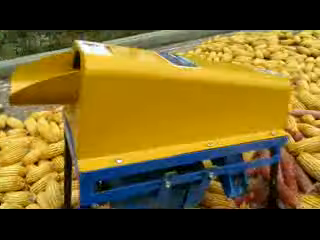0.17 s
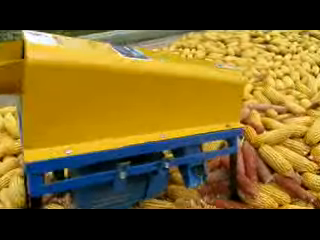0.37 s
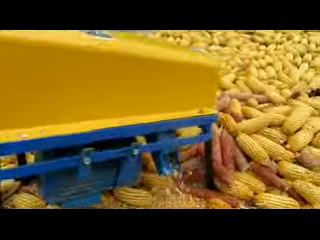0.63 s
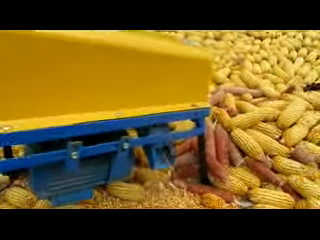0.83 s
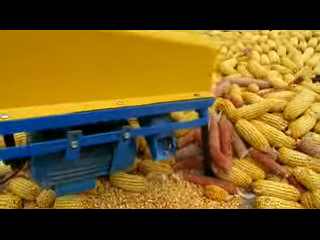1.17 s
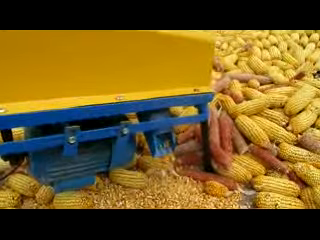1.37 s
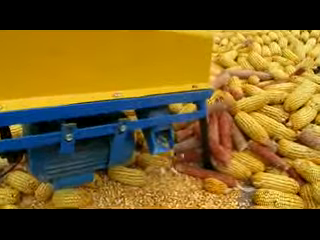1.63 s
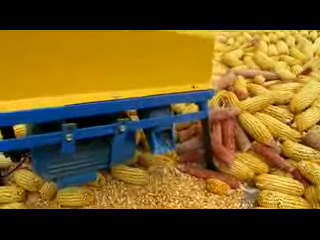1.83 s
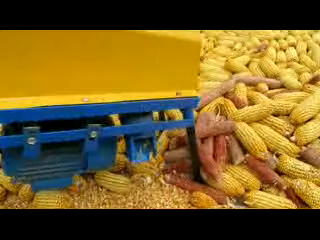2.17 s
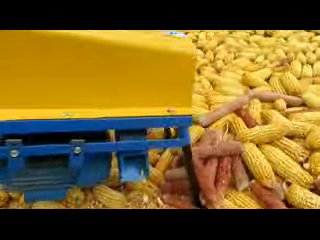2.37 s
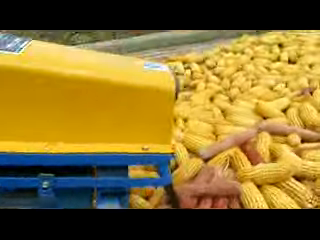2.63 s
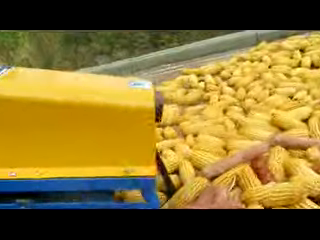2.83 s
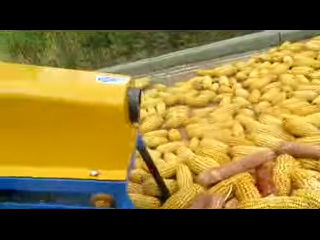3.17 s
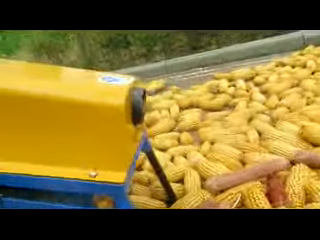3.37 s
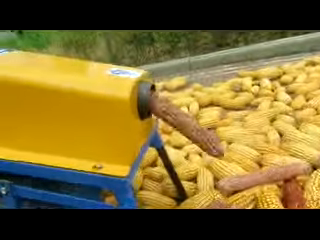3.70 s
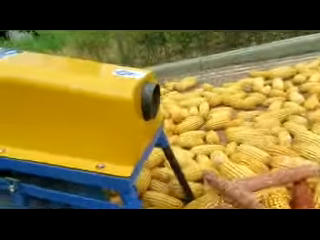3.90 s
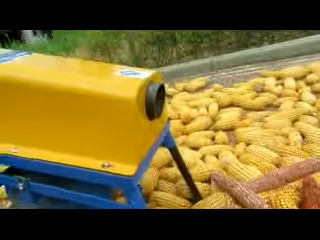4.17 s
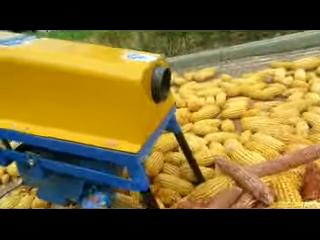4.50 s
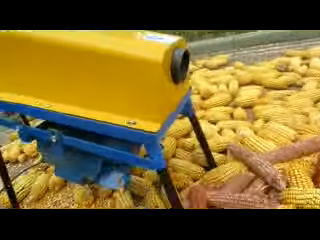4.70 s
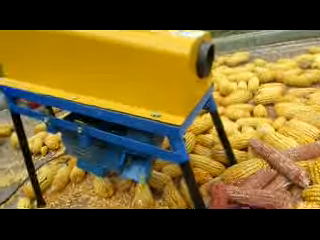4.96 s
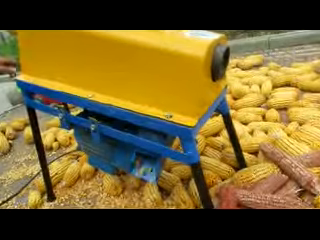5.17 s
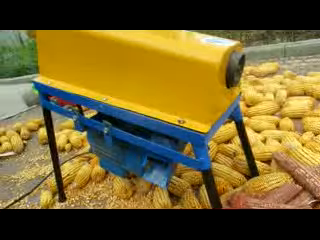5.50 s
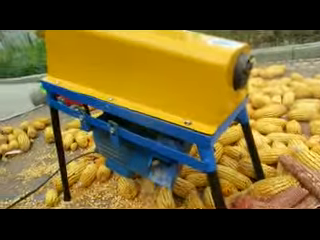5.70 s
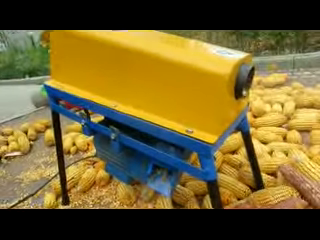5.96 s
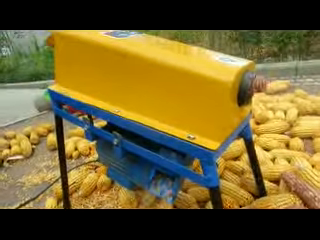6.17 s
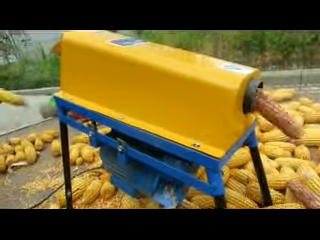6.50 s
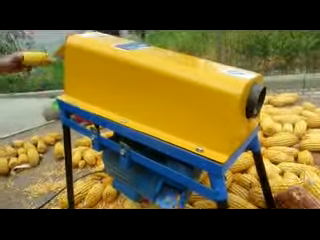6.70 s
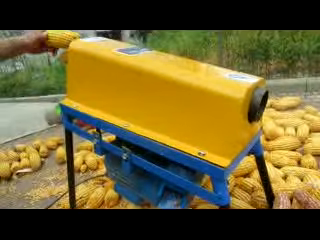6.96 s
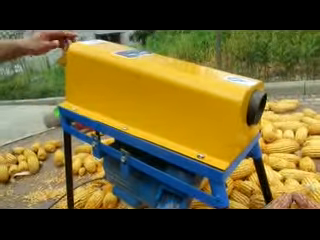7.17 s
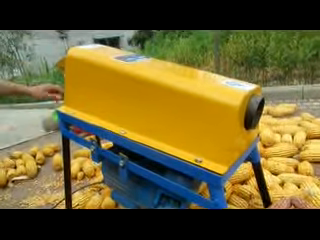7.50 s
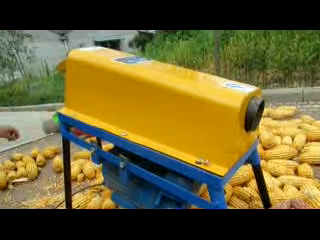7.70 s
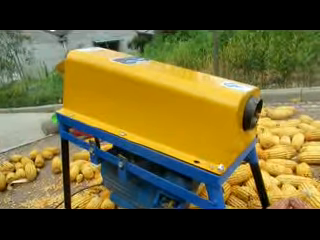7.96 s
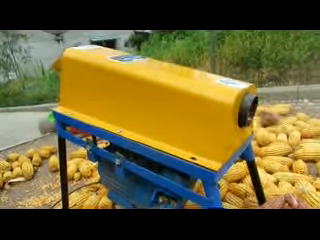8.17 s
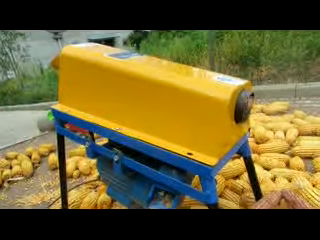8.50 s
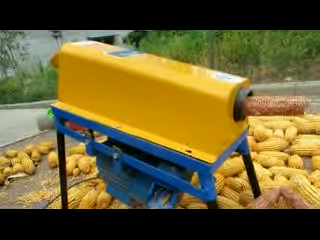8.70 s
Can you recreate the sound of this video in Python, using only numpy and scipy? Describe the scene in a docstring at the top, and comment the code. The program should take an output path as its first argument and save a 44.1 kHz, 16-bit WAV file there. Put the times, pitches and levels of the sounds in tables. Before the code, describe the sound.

A small electric corn sheller grinds ear after ear in harsh, raspy bursts that sag and stutter, with kernels pelting its sheet-metal housing.

```python
"""Outdoors, close by, a small electric corn sheller strips one ear after another.
The grinding is a frequency-modulated chatter that swerves wildly, slips and sags as each cob runs bare.
Loose kernels are random impulses that ring the modes of the sheet-metal housing throughout.
Between ears, cobs knock as noise bursts and bump as decaying tones, and a fresh ear tumbles as filtered impulses.
Under it all lies a faint motor: drifting hum lines and the rotor's coloured noise."""
import sys
import numpy as np
from scipy import signal
from scipy.fft import rfft, irfft
from scipy.io import wavfile
from scipy.ndimage import uniform_filter1d

SR = 44100
rng = np.random.default_rng(int(sys.argv[2]) if len(sys.argv) > 2 else 0)


def generate_wav(signal):
    """Clip the signal to [-1, 1] and save it as 16-bit WAV at the path in sys.argv[1]."""
    frames = np.transpose(np.atleast_2d(signal))
    scaled = np.clip(frames, -1, 1) * 32767
    pcm = np.round(scaled).astype(np.int16)
    wavfile.write(sys.argv[1], SR, pcm)


N = 389844

# Bouts of grinding, one for each ear or brief bite; levels and rates are relative, scaled again below:
# start t/s, end t/s, level/dB, full chatter f/Hz, end chatter f/Hz, sag time constant/s,
# kernel spray level/dB, level/dB of kernels left bouncing
GRINDING_BOUTS = [(0, .136, -9.5, 2550, 2499, .3, -26, -23.5),
                  (.174, 1.955, -9.5, 3330, 751, .29, -21, -27),
                  (2.908, 4.33, -9.5, 3699, 1951, .5, -20.5, -23),
                  (5.3, 6.975, -8, 3900, 249.9, .32, -18, -32),
                  (7.185, 7.218, -6.5, 1451, 1150, .3, -24, -43),
                  (7.741, 8.85, -6.5, 3647, 1847, .4, -16.6, -30)]
# The ear slips and the chatter runs down: start t/s, end t/s, share of the rate lost by the end (0-1)
EAR_SLIPS = [(.44, .48, .22), (.58, 0.649, .2), (1.4, 1.5, 0.17), (1.715, 1.812, 0.65),
             (1.858, 1.898, 0.27), (3.48, 3.57, .27), (3.905, 3.972, 0.31), (4.272, 4.329, .58),
             (5.29, 5.372, 0.47), (6.21, 6.27, .14), (6.36, 6.42, .33), (6.6, 6.626, .52),
             (6.706, 6.727, 0.61), (6.845, 6.885, .48), (7.185, 7.22, .5), (7.742, 7.79, 0.49)]
# Teeth snatch at a nearly bare cob and the chatter leaps: t/s, leap f/Hz (before speed scaling), t60/s
TOOTH_SNATCHES = [(1.815, 900.3, .05), (1.848, 1098, .05), (1.898, 1400, .06), (1.913, 2503, 0.23),
                  (6.693, 1400, .06), (6.882, 1106, .06), (6.913, 1000, 0.037), (6.933, 1200, .07),
                  (6.97, 1400, .025), (7.185, 2600, .035)]
# How well the machine radiates the chatter: f/Hz, level/dB
CHATTER_RADIATION = [(5, -50), (25, -30), (70, -25.5), (130, -16), (300, -7.5), (480, -5.5), (750, 0.5),
                     (1500, 0), (3000, -1), (6000, 0), (11000, -1.5)]
# Relative colour of the frame's shudder: f/Hz, level/dB (per Hz)
FRAME_COLOUR = [(10, -35), (40, -9), (100, -8), (200, 0.5), (350, 4.5), (650, -10), (1200, -27),
                (3000, -45)]
# Colour of the chatter's difference between the channels: f/Hz, level/dB
CHATTER_SIDE = [(10, -40), (100, -23.5), (350, -11.5), (1000, -14), (2000, -37), (3000, -43), (4000, -40),
                (10000, -18)]
# Relative colour of the kernel impacts: f/Hz, level/dB (per Hz)
IMPACT_COLOUR = [(40, -50), (100, -27), (200, -20), (350, -13.5), (520, -24), (620, -4), (1100, -4.5),
                 (2000, -0.5), (3200, 0), (4800, 1), (6200, 2), (8500, 2), (11000, -7.5)]
# Ringing modes of the sheet-metal housing, relative to each other: f/Hz, width/Hz, level/dB
HOUSING_MODES = [(253, 22, -8), (354, 100, -11), (635, 16, 0), (827, 12, -22), (993, 100, -4),
                 (1120, 37, -1), (1302, 16, 1), (1528, 35, -8), (1830, 33, -10), (2400, 15, -3),
                 (2710, 24, -10), (2860, 8.3, -26), (3110, 31, -12), (3530, 30, -10.5), (4520, 42, -11)]
# Cobs knock the housing and fling a burst of kernels: t/s, relative level/dB, t60/s
COB_KNOCKS = [(2.351, -22.5, 0.48), (2.42, -22.5, 0.37), (2.578, -17, 0.64), (2.679, -11, .45),
              (2.819, -13, 0.23), (4.415, -19, 0.31), (4.447, -19, 0.97), (4.55, -17, 0.91),
              (4.625, -14.5, 0.54), (4.72, -21, 0.6), (4.788, -14.5, 0.25), (4.883, -19, 0.16),
              (4.922, -19.5, 0.23), (4.96, -17, 0.31), (5.029, -18, 0.34), (5.104, -18.5, 0.19),
              (5.175, -13, 0.43), (5.255, -17, 0.22), (7.016, -19.5, 0.23), (7.078, -20.5, 0.41),
              (7.1, -20, 0.29), (7.32, -22.5, .16), (7.41, -24, 0.092), (7.478, -17, 0.14),
              (7.555, -22, 0.28), (7.599, -28, 0.15)]
# Side level relative to mid, for all noise but the chatter: f/Hz, level/dB
STEREO_WIDTH = [(100, -10), (800, -10.5), (1500, -32), (2300, -32), (2900, -35), (3700, -18.5), (6300, -17),
                (6900, -10.5), (7500, -13), (10500, -11)]
# Motor hum lines: nominal f/Hz, rms level/dB
HUM_LINES = [(101, -67), (161, -60.5), (248, -60), (743, -51), (1200, -46.5), (1335, -48)]
# Relative colour of the running rotor's rush: f/Hz, level/dB (per Hz)
ROTOR_COLOUR = [(30, -36), (70, -34), (110, -18), (250, -0.5), (520, -1), (750, 7), (1250, 5.5),
                (1420, -10), (3000, 5), (10000, -17)]
# A fresh ear tumbles ever harder until gripped: gripped at t/s, rumble level/dB, relative spray level/dB
EAR_FEEDS = [(.174, -31, -29), (2.908, -19, -17), (5.3, -38, -21.5), (7.741, -30, -17.5)]
# Relative colour of the tumbling rumble: f/Hz, level/dB (per Hz)
DRUM_COLOUR = [(40, -40), (100, -9.5), (200, -4.5), (310, 5.5), (450, -3.5), (800, 0.5), (1300, -10),
               (3000, -28)]
# Dull bumps of cobs against the machine and the heap: t/s, f/Hz, level/dB, t60/s
COB_BUMPS = [(1.955, 130, -18, 0.046), (2.682, 974, -17.5, .54), (2.765, 948, -30, .3),
             (2.825, 798, -17, 0.31), (2.878, 279.8, -18.5, .12), (4.33, 90.1, -30, 0.067),
             (4.505, 824, -17.5, 0.24), (4.66, 2380, -24, .3), (4.795, 2380, -20.5, 0.29),
             (4.825, 3300, -27, .25), (5.176, 994, -24.5, 0.35), (6.975, 120, -31, 0.047),
             (7.22, 90, -21, 0.092)]

TOP_HZ = 11100
TIME = np.arange(N) / SR
FREQ = np.maximum(np.arange(N // 2 + 1) * SR / N, 1e-3)


def undb(db):
    """Decibel law: level to amplitude gain."""
    return 10 ** (np.asarray(db) / 20)


def unit(x):
    """Normalisation: scale to rms 1."""
    return x / np.sqrt(np.mean(x ** 2))


def colour(table):
    """Spectral envelope: levels interpolated over log frequency, as gains."""
    hz, db = np.transpose(table)
    return undb(np.interp(np.log(FREQ), np.log(hz), db))


def shape(x, response):
    """Linear filtering: multiplication by a frequency response."""
    return irfft(rfft(x) * response, N)


def coloured_noise(table):
    """Noise synthesis: white noise filtered to a spectral envelope, rms 1."""
    return unit(shape(rng.standard_normal(N), colour(table)))


def wander(hz):
    """Low-pass noise: random motion of spread 1, mostly slower than hz."""
    return unit(shape(rng.standard_normal(N), 1 / (1 + (FREQ / hz) ** 2)))


def decay(start, t60):
    """Exponential damping: sudden rise, then a fall of 60 dB in t60 seconds."""
    age = TIME - start
    return (age >= 0) * np.exp(-np.log(1000) * np.clip(age / t60, 0, 10))


def during(start, end):
    """Gating: 1 between two times, 0 elsewhere."""
    return 1. * ((TIME >= start) & (TIME < end))


def stereo(mid, side):
    """Sum and difference: left and right from mid and side."""
    return mid + side * np.array([[1], [-1]])


def chatter_rate():
    """Varying load: the base rate in Hz sags as the cob runs bare, falls in slips and leaps in snatches."""
    rate = np.zeros(N)
    for start, end, _, full_hz, end_hz, sag_s, _, _ in GRINDING_BOUTS:
        bare = np.exp(np.minimum(TIME - end, 0) / sag_s)
        rate += during(start, end) * (full_hz + (end_hz - full_hz) * bare)
    for start, end, lost in EAR_SLIPS:
        progress = during(start, end) * (TIME - start) / (end - start)
        rate *= 1 - lost * np.sqrt(progress)  # falls fastest as the ear lets go
    return rate + sum(leap_hz * decay(s, t60) for s, leap_hz, t60 in TOOTH_SNATCHES)


def gripping():
    """Amplitude gating: the grinding starts and stops abruptly with each bout."""
    grip = sum(undb(db) * during(start, end) for start, end, db, *_ in GRINDING_BOUTS)
    return uniform_filter1d(grip, size=40)  # smoothed over 40 samples


def teeth(per_s=97, uneven=.22, uneven_hz=50, fall=.3):
    """Relaxation: each tooth's surge decays over a share (fall) of the gap between teeth; it averages zero."""
    turn = np.cumsum(per_s * (1 + uneven * wander(uneven_hz))) / SR % 1
    surge = np.exp(-turn / fall)
    return unit(surge - np.mean(surge))


def grinding():
    """Frequency modulation: a chatter of nearly fixed swing whose rate lurches, swerves and is roughened by grit."""
    speed, drag_hz = 1.08, 420  # scale and offset of the base rate
    swerve_hz, swerve_speed_hz = 620, 240  # spread and quickness
    lurch_hz, lurch_speed_hz = 320, 55
    steadying = .3  # share of the unrest lost at full effort
    tooth_hz, stall_hz = 800, 500
    grit, grit_speed_hz = .47, 2800
    edge = .23  # second harmonic, relative to the first
    rasp_db, rasp_speed_hz, shudder_db = -13, 5500, -11
    catch_db, catch_speed_hz, heavy_db, trim_db = .81, 90, 2.5, -.52

    base = chatter_rate()
    effort = base / np.max(base)
    unrest = swerve_hz * wander(swerve_speed_hz) + lurch_hz * wander(lurch_speed_hz)
    rate = speed * base - drag_hz + unrest * (1 - steadying * effort ** 2)
    # on a nearly bare cob the single teeth come through as separate knocks
    rate = rate + tooth_hz * (1 - effort) ** 3 * teeth()
    # the faster it runs, the more grit smears the chatter into a roar
    roughness = grit * base * np.sqrt(effort) * wander(grit_speed_hz)
    phase = 2 * np.pi * np.cumsum(rate + roughness) / SR
    swing = np.sqrt(2) * (np.sin(phase) + edge * np.cos(2 * phase))
    # the swing dies away whenever the rate sags towards a stall, so it stutters
    swing = swing * np.maximum(rate, 0) / np.hypot(rate, stall_hz)
    # fast chatter rasps; slow chatter shakes the whole frame
    rasp, rasp_side = (undb(rasp_db) * effort * wander(rasp_speed_hz) for _ in range(2))
    shudder = undb(shudder_db) * (1 - effort) ** 2 * coloured_noise(FRAME_COLOUR)
    # the teeth catch the ear unevenly, and the swing grows heavier as it slows
    catch = catch_db * wander(catch_speed_hz)
    grip = gripping() * undb(catch + heavy_db * (1 - effort) + trim_db)
    mid = shape(grip * (swing + rasp), colour(CHATTER_RADIATION)) + grip * shudder
    side = shape(grip * rasp_side, colour(CHATTER_SIDE))
    return stereo(mid, side)


def feeding(gripped):
    """Exponential growth: a tumbling ear swells until the teeth grip it, then dies quickly."""
    rise_db_per_s, fall_db_per_s = 65, 400
    below_peak_db = np.maximum(rise_db_per_s * (gripped - TIME), fall_db_per_s * (TIME - gripped))
    return undb(-below_peak_db)


def spray():
    """Power addition: kernel force follows the chatter, runs out after bouts and swells as an ear stirs the drum."""
    rate_exponent, run_out_t60_s, idle_db = .95, 1.66, -37.5  # idle level is relative
    rate = chatter_rate()
    power = undb(idle_db) ** 2
    power = power + sum((undb(db) * feeding(s)) ** 2 for s, _, db in EAR_FEEDS)
    for start, end, _, full_hz, _, _, spray_db, left_db in GRINDING_BOUTS:
        stripped = during(start, end) * undb(spray_db) * (rate / full_hz) ** rate_exponent
        left = undb(left_db) * decay(end, run_out_t60_s)
        power = power + stripped ** 2 + left ** 2
    return np.sqrt(power)


def pelting(per_s, scatter):
    """Shot noise: random impulses of either sign, most small and a few hard."""
    hits = rng.random(N) < per_s / SR
    size = undb(scatter * np.minimum(rng.exponential(size=N), 4))
    return unit(hits * size * rng.choice([-1, 1], N))


def sheet_metal(ring_db=4):
    """Modal superposition: the tick itself plus panel resonances, scaled so that its power below TOP_HZ,
    averaged over the whole band up to half the sample rate, is 1 (a mean power gain near 2 below TOP_HZ)."""
    panels = sum(undb(db) / (1 + 1j * (FREQ ** 2 - hz ** 2) / (FREQ * width))
                 for hz, width, db in HOUSING_MODES)
    response = colour(IMPACT_COLOUR) * (1 + undb(ring_db) * panels)
    return response / np.sqrt(np.mean(np.abs(response) ** 2 * (FREQ < TOP_HZ)))


def knock_burst(s, db, t60, gain_db=1.0, rise_s=.0012):
    """Transient excitation: the force of a knock rises softly, then decays exponentially."""
    rise = -np.expm1(-np.abs(TIME - s) / rise_s)
    return undb(db + gain_db) * decay(s, t60) * rise


def kernels(spray_db=3.5, per_s=7000, scatter=1.05, flutter_db=2.5, flutter_hz=35):
    """Impulse response: kernels tick on the housing and ring it; each knock adds a dying burst."""
    force = spray() * undb(spray_db + flutter_db * wander(flutter_hz))
    burst_power = sum(knock_burst(s, db, t60) ** 2 for s, db, t60 in COB_KNOCKS)
    force = np.sqrt(force ** 2 + burst_power)
    housing = sheet_metal()
    mid, side = (force * pelting(per_s, scatter) for _ in range(2))
    return stereo(shape(mid, housing), shape(side, housing * colour(STEREO_WIDTH)))


def motor(rush_db=-36, drift=.00404, drift_hz=4):
    """Additive synthesis: hum lines drift together in proportion, over the noisy rush of the rotor."""
    turn = 2 * np.pi * np.cumsum(1 + drift * wander(drift_hz)) / SR
    hum = sum(np.sqrt(2) * undb(db) * np.sin(hz * turn) for hz, db in HUM_LINES)
    mid, side = (undb(rush_db) * coloured_noise(ROTOR_COLOUR) for _ in range(2))
    return stereo(hum + mid, shape(side, colour(STEREO_WIDTH)))


def tumbling(per_s=900, scatter=2.0):
    """Filtered shot noise: a fresh ear bounces round the drum in many soft blows before it is gripped."""
    force = sum(undb(db) * feeding(s) for s, db, _ in EAR_FEEDS)
    drum = colour(DRUM_COLOUR)
    mid, side = (force * unit(shape(pelting(per_s, scatter), drum)) for _ in range(2))
    return stereo(mid, shape(side, colour(STEREO_WIDTH)))


def bumps(rough=.68, rough_hz=60, buzz_rad=.74, buzz_hz=110):
    """Damped oscillation: the cob keeps touching the panel, so each ring is uneven in level and pitch."""
    wobble = buzz_rad * wander(buzz_hz)
    rings = sum(undb(db) * decay(s, t60) * np.sin(2 * np.pi * hz * (TIME - s) + wobble)
                for s, hz, db, t60 in COB_BUMPS)
    return rings * (1 + rough * wander(rough_hz))


def scene():
    """Superposition: all sources of the machine add."""
    return grinding() + kernels() + motor() + tumbling() + bumps()


def record(dry, ceiling=.82):
    """Saturation and band limiting: the highest peaks are rounded and the top is cut."""
    rounded = dry / (1 + (dry / ceiling) ** 8) ** (1 / 8)
    low_pass = signal.ellip(12, .2, 70, TOP_HZ, fs=SR, output="sos")
    return signal.sosfilt(low_pass, rounded)


dry = scene()
out = record(dry)
generate_wav(out)
```